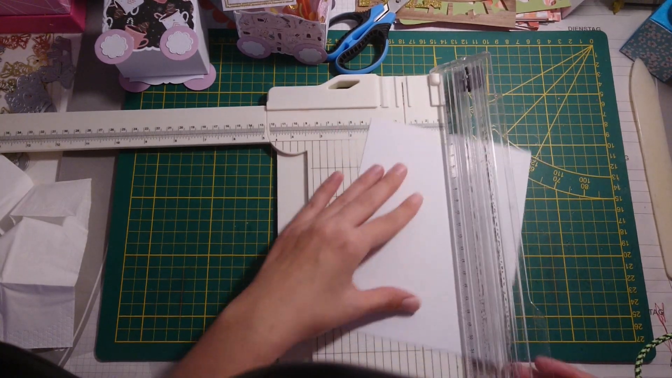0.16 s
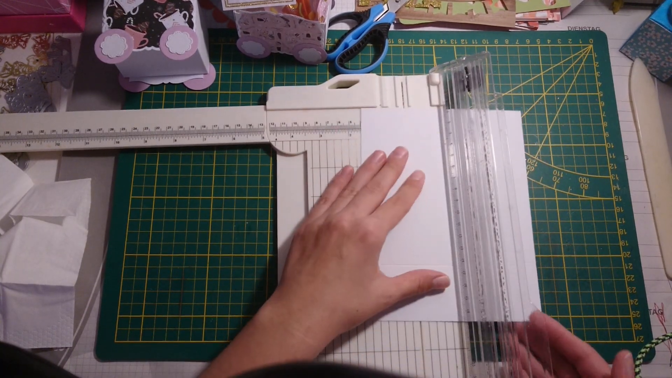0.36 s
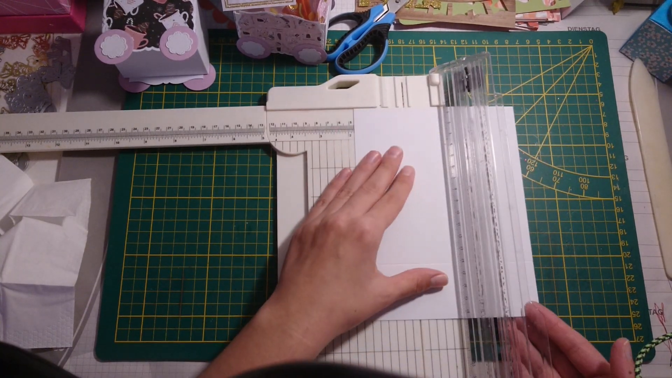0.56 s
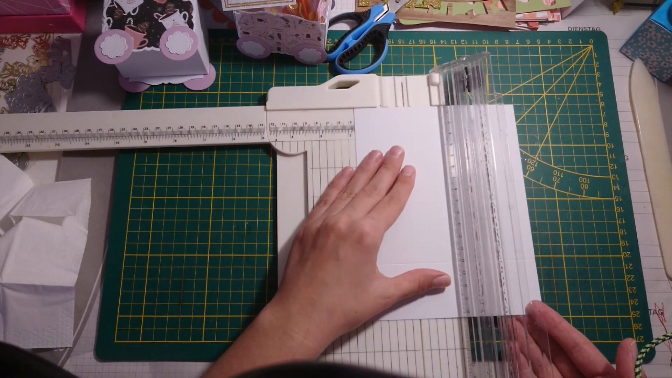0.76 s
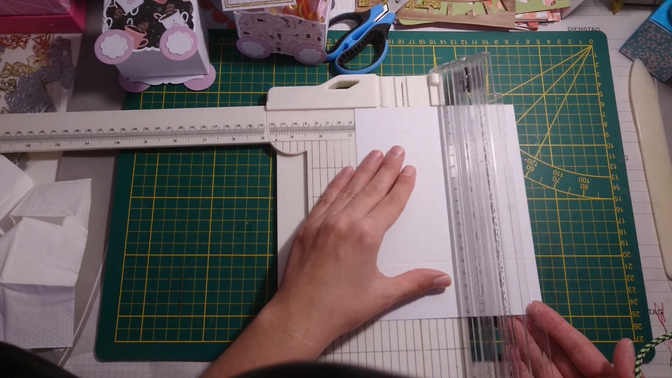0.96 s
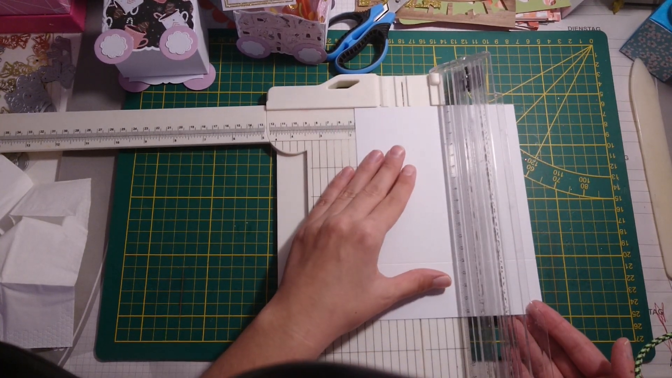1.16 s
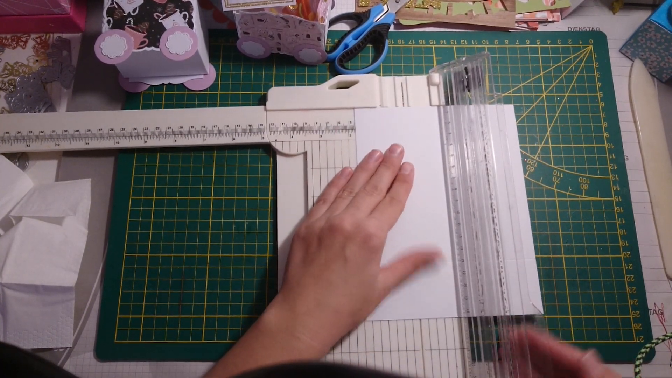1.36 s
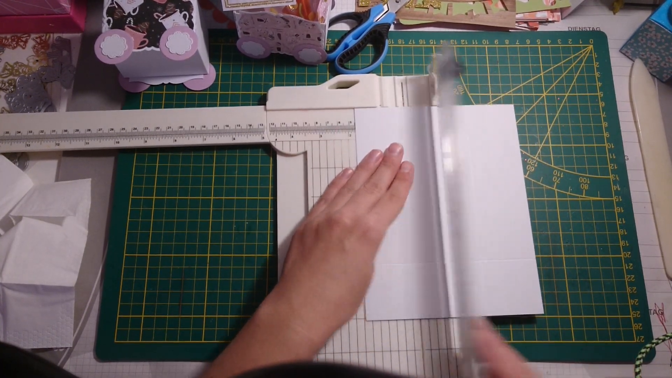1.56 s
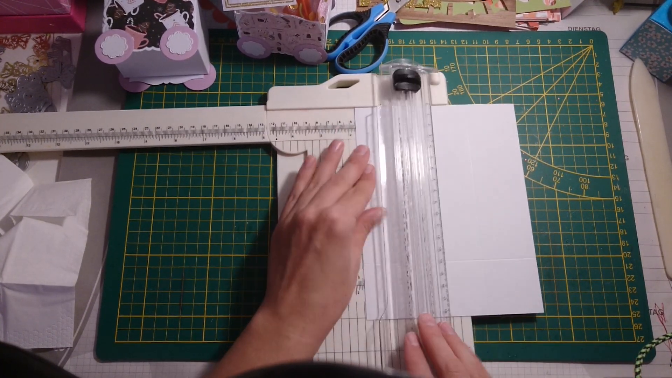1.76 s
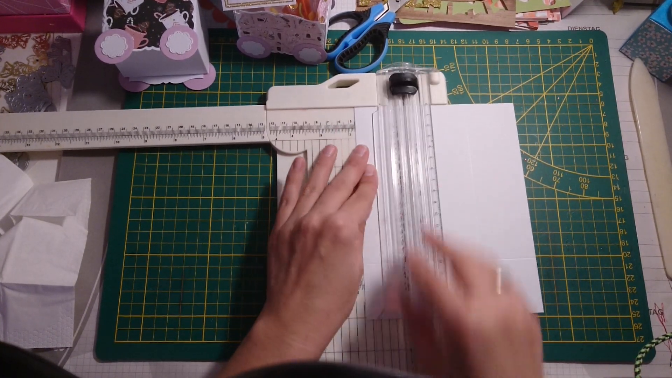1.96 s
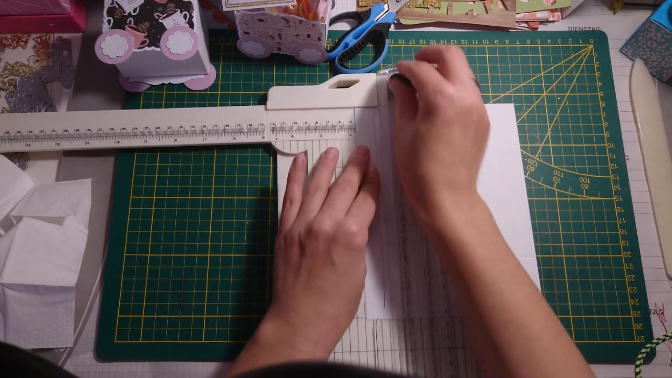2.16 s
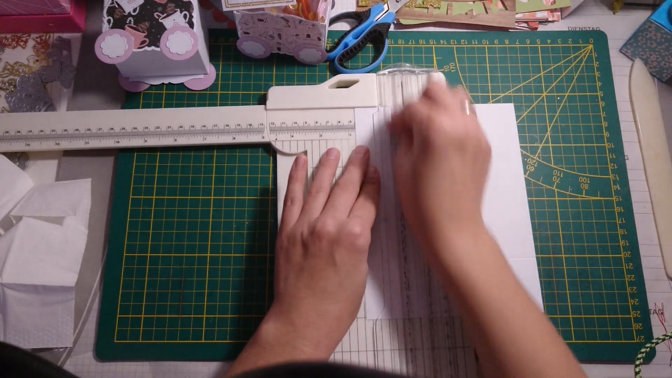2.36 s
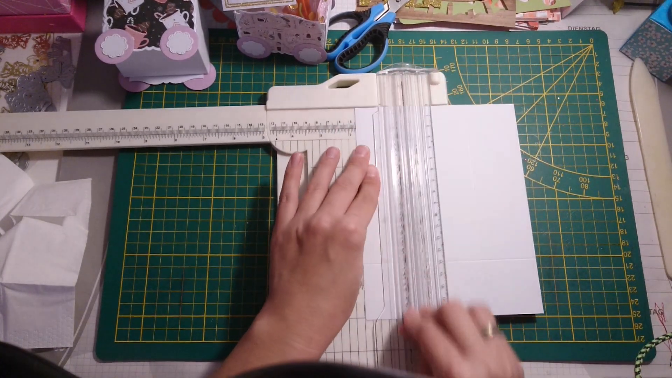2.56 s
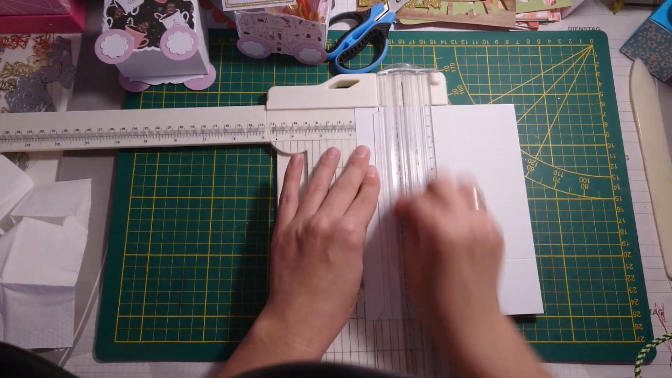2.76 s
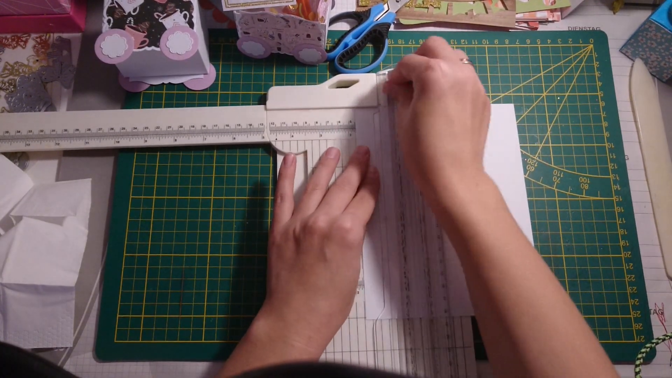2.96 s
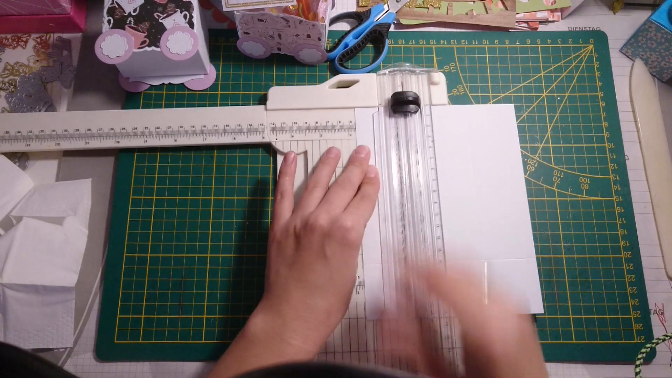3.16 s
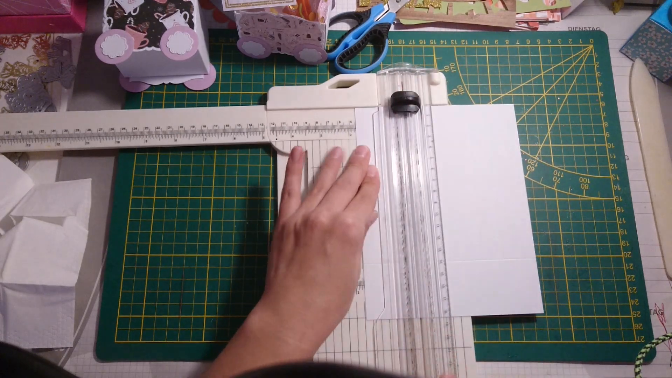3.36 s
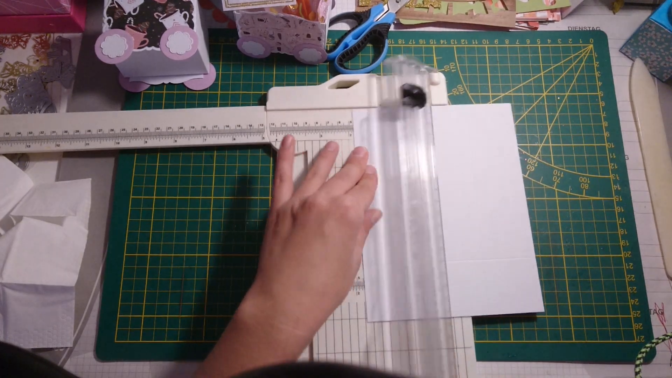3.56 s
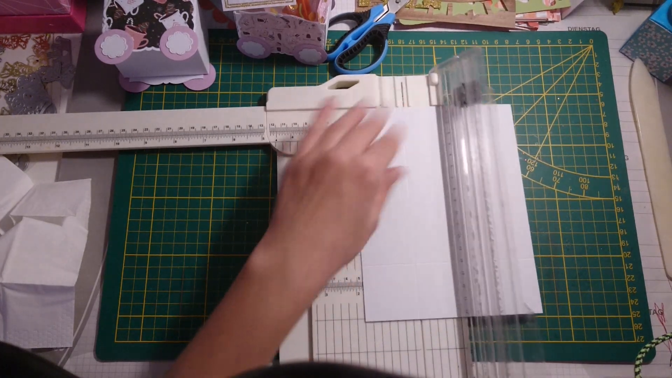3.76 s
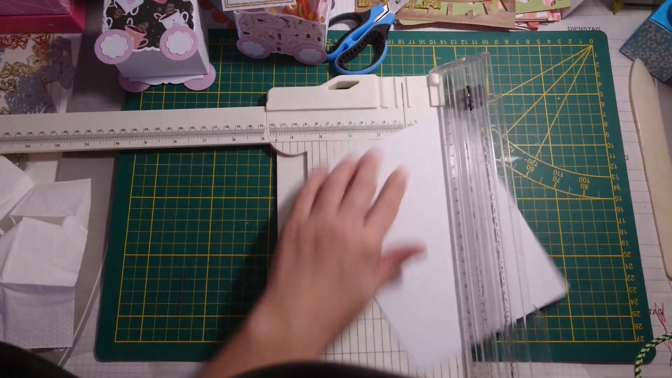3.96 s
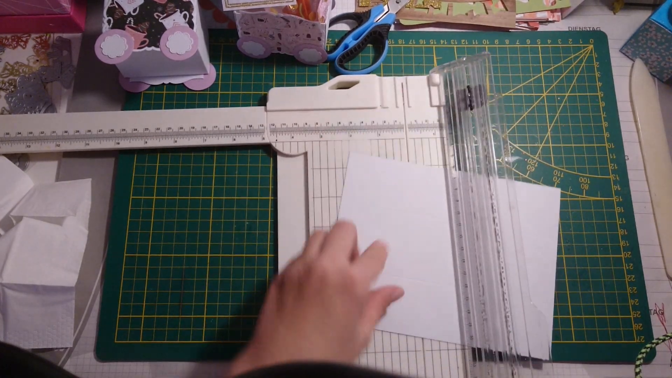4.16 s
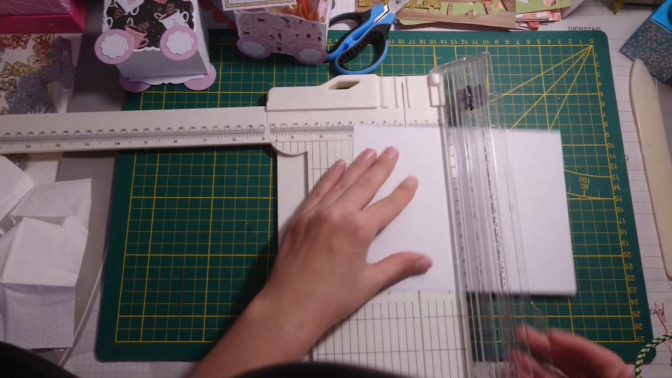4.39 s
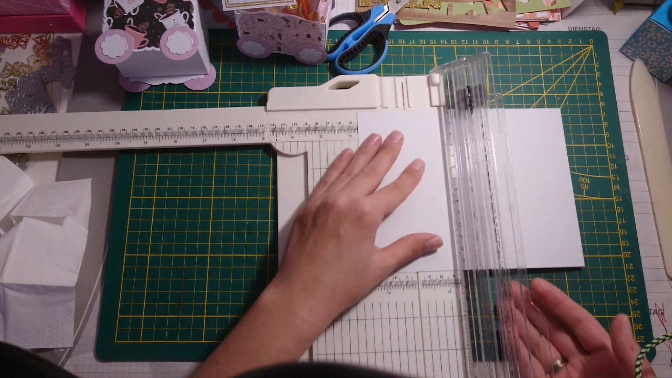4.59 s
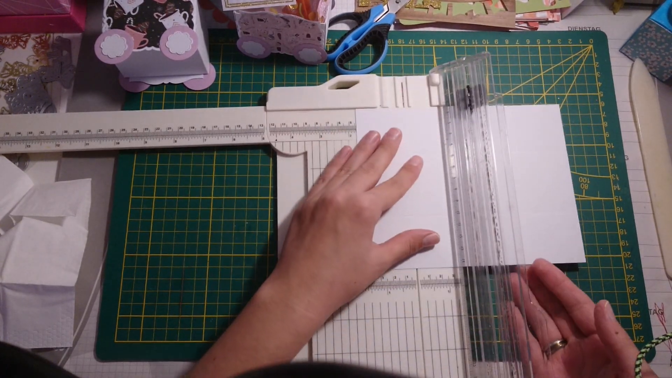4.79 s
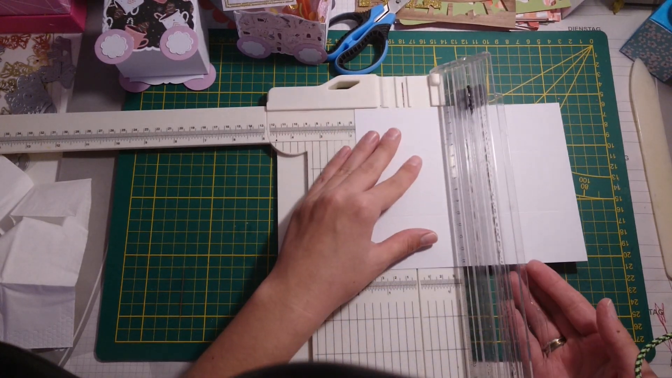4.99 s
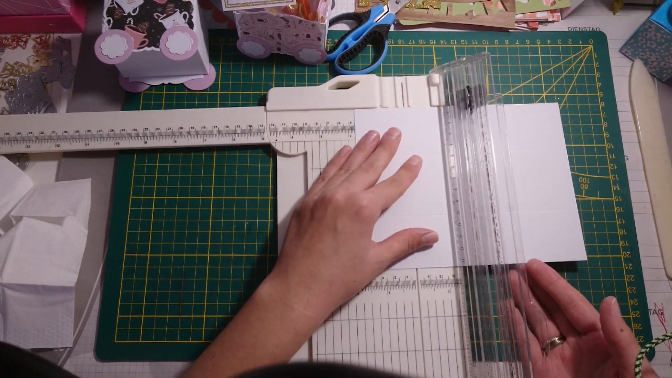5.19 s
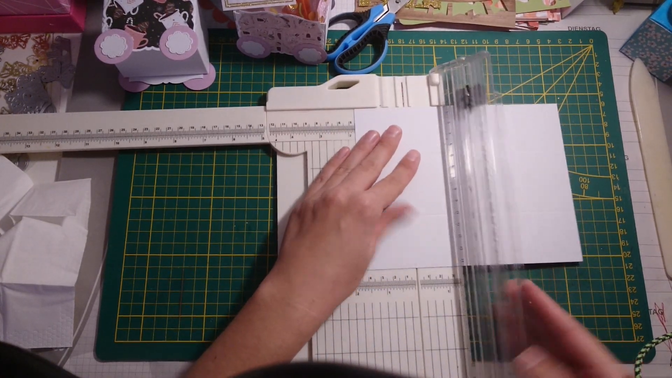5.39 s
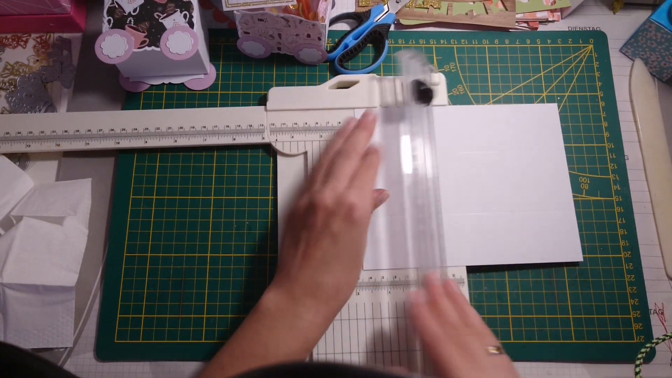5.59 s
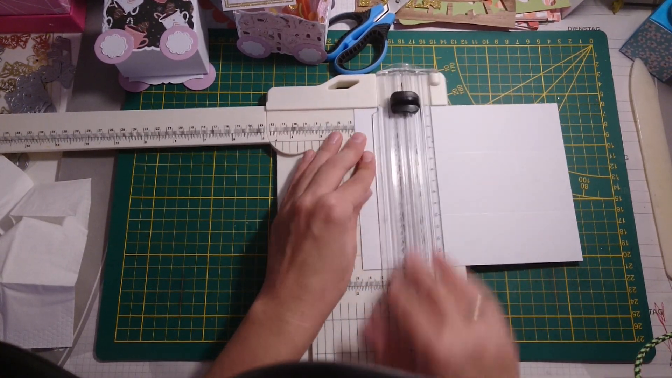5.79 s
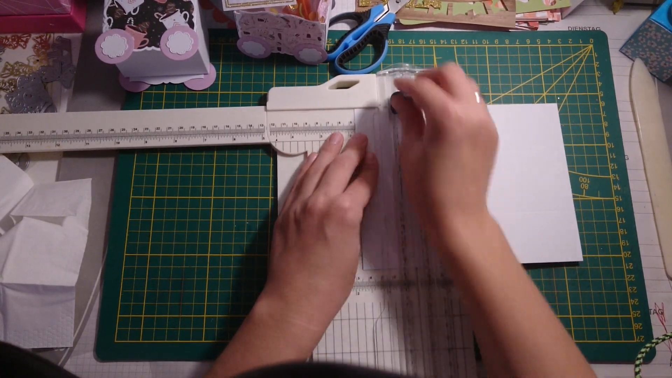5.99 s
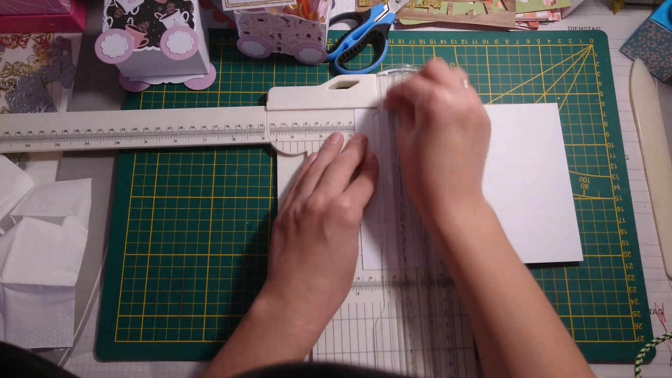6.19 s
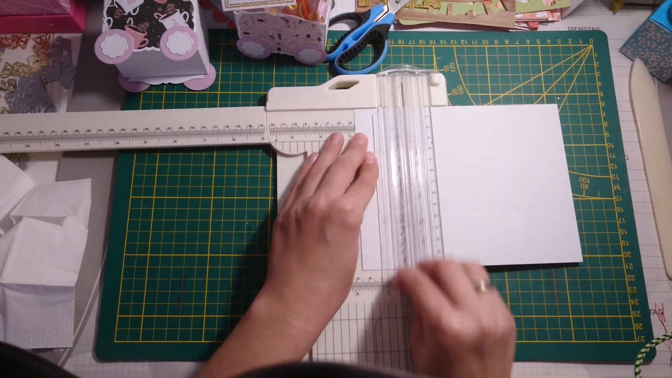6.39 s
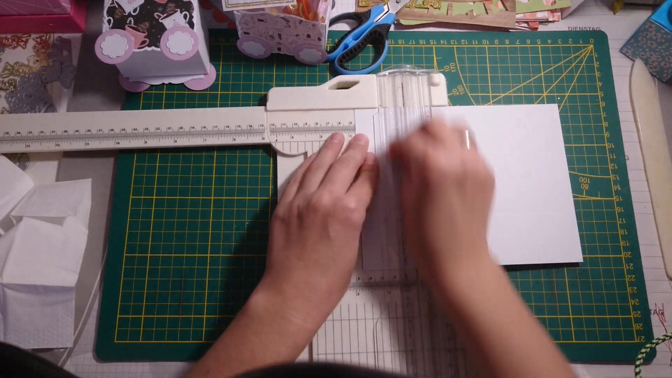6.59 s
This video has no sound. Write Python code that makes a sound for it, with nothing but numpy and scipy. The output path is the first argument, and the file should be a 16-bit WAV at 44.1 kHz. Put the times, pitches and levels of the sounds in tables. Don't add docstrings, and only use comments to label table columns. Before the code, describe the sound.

Close above a desk in a small room, card rustles onto a plastic paper trimmer and pauses. A brief hinge squeak leads into a rattling slam, then the slider rasps back and forth to a loud click. The guide clatters open, the sheet swishes round with a short whine, and after a quieter pause a harder slam and more scraping follow. A faint fan hums, stronger at the right.

```python
import sys
import numpy as np
from scipy import signal
from scipy.fft import rfft, irfft
from scipy.io import wavfile
from scipy.ndimage import uniform_filter1d

SR = 44100
rng = np.random.default_rng(int(sys.argv[2]) if len(sys.argv) > 2 else 0)


def decibels_to_gain(level_db):
    exponent = np.asarray(level_db, float) / 20
    return 10 ** exponent


def bounce(signal):
    frames = np.transpose(np.atleast_2d(signal))
    limited = np.clip(frames, -1, 1)
    pcm = np.round(limited * 32767).astype(np.int16)
    wavfile.write(sys.argv[1], SR, pcm)


N = 292824

# [f/Hz, density/dB per Hz]
FLOOR_LEFT = [(32, -112), (48, -95), (120, -107), (280, -119), (380, -115), (780, -125), (1300, -122),
              (1700, -112), (2300, -125), (3800, -122), (5000, -132), (7000, -123), (10500, -134),
              (11900, -146), (12500, -130), (13000, -146)]
FLOOR_RIGHT = [(32, -114), (48, -103), (120, -110), (280, -117), (540, -104), (680, -92.5), (780, -86),
               (900, -92), (1120, -101), (1950, -115), (2300, -110), (2950, -118), (3500, -110),
               (5000, -130), (9500, -128), (11900, -144), (12300, -123), (12650, -123), (13000, -146)]
# [f/Hz, level/dB]
PORT_LEFT = [(40, 0.5), (1000, -7), (2000, -4.5), (3000, 0.5), (3700, 3.5), (4600, 4), (5100, -2.5),
             (6000, 3.5), (6800, 3), (7900, -8.5), (8900, -4), (10000, -14), (10900, -44), (12500, -46),
             (13800, -56)]
PORT_RIGHT = [(40, 0), (1000, -14), (1700, -4.5), (2500, -9), (3100, -17), (3900, -2.5), (4600, -9.5),
              (5500, -5), (8000, -18.5), (11000, -27.5), (11700, -39), (12500, -22), (13200, -33),
              (13800, -51.5)]
# [delay/ms, left level/dB, right level/dB]
ECHOES = [(6.817, -18, -3.5), (11.7, -23, -20.5), (25.44, -17, -36), (.3, -16.5, -7), (0.751, -20, -12),
          (1.886, -20, -10)]
# [level/dB, low f/Hz, high f/Hz]
WASH_BANDS = [(13.4, 2890, 4900), (25.4, 950, 3150), (28.8, 260, 950), (26.1, 7000, 12600)]
# [f/Hz, level/dB, t60/s]
GUIDE = [(1004, 2, 0.014), (1380, -1, 0.015), (1692, 4, 0.016), (1950, 8.5, 0.0054), (2580, 3.5, 0.016)]
BASE = [(203, -16.5, 0.31), (346, -1.5, 0.067), (452, 5.5, 0.032), (567, 7.5, 0.03), (674, 9, 0.026),
        (787, 8.5, 0.026)]
RULER = [(3680, 0, .009), (3270, -12, .007), (4730, -4, .008)]
EDGE_RING = [(9300, -1.5, 0.0029), (7170, 0.5, 0.005)]
# [f/Hz, level/dB, t60/s]
DESK_LOW = [(51.7, -16.5, 0.33), (66.3, 1.5, 0.48)]
DESK_HIGH = [(129, 5, 0.14), (148, -6, 0.19)]
# [t/s, upper mode peak level/dB, lower mode re upper/dB]
THUDS = [(0.004, -61, -11.5), (0.191, -60, -14), (1.696, -68, -17), (1.816, -65.5, -1), (1.911, -54.5, -4),
         (2.301, -68, -23), (2.718, -45, -11), (2.86, -53, -9), (2.954, -43.5, -17.5), (3.357, -60.5, -8),
         (3.602, -93, -9), (3.93, -54.5, -23), (4.327, -64, -6), (5.449, -65.5, -7), (5.768, -61, 2.5),
         (6.099, -59.5, -10), (6.273, -65, -16), (6.441, -53.5, -6), (6.548, -46.5, -10)]
# [peak t/s, rise/s, fall/s, f/Hz, level/dB]
CREEPS = [
    (.55, 0.42, 0.45, 353, -91.5),
    (.65, 0.67, 0.28, 1640, -83.5),
    (2.199, 0.19, 0.52, 1588, -74.5),
    (6.271, 0.059, .06, 7000, -74.5),
]
# [t/s, f/Hz, level/dB]
SQUEAK_LOW = [(1.56, 1213, -73), (1.586, 1216, -49.5), (1.602, 1313, -59.5), (1.613, 1237, -51),
              (1.632, 1230, -56), (1.652, 1286, -66), (1.672, 1207, -75), (1.692, 1286, -69),
              (1.715, 1235, -69.5)]
SQUEAK_MID = [(1.578, 1500, -100), (1.588, 1570, -56.5), (1.598, 1700, -61.5), (1.61, 1540, -59),
              (1.622, 1560, -87)]
SQUEAK_HIGH = [(1.575, 2410, -83), (1.585, 2460, -69), (1.596, 2610, -57.5), (1.607, 2540, -74.5),
               (1.615, 2573, -66), (1.628, 2550, -77.5)]
# [t/s, f/Hz, level/dB]
WHINES = [
    [(3.94, 2775, -68), (3.958, 2730, -46), (3.984, 2570, -56), (3.992, 2555, -37.5), (4.03, 2580, -53)],
    [(5.46, 1700, -55.5), (5.585, 1887, -50), (5.63, 1910, -74)],
]
# [peak t/s, rise/s, fall/s, scrape level/dB, board drone level/dB]
CARD_SLIDES = [(0, 0.042, 0.1, -60.5, -60.5), (.2, 0.037, 0.25, -64.5, -73.5),
               (.33, 0.21, 0.075, -66.5, -76), (.48, 0.14, 0.13, -78, -81), (.62, 0.12, 0.24, -89, -85.5),
               (1.44, 0.19, 0.25, -74.5, -88), (1.57, 0.086, 0.29, -73.5, -70),
               (4.35, 0.089, 0.29, -63.5, -76), (4.62, 0.22, 0.1, -79, -85),
               (4.78, 0.029, 0.26, -82.5, -96), (5.41, 0.052, 0.24, -74, -79.5),
               (5.574, 0.18, 0.037, -66.5, -62), (5.65, 0.049, 0.11, -66.5, -65.5),
               (5.76, 0.044, 0.029, -66.5, -62)]
SLIDER_RUNS = [(2.4, 0.032, .35, -65, -57.5), (2.478, 0.085, 0.074, -61, -54.5),
               (2.56, 0.22, 0.15, -61, -52.5), (2.635, 0.16, 0.0079, -63.5, -54),
               (2.73, 0.041, 0.29, -61, -61), (2.8, 0.11, 0.11, -63, -54.5), (2.85, 0.1, 0.088, -63, -55),
               (2.91, 0.092, 0.064, -64, -58.5), (6.28, 0.044, 0.2994, -63.5, -62),
               (6.375, 0.11, .1, -60, -50.5), (6.43, 0.16, 0.11, -61.5, -50),
               (6.55, 0.074, 0.089, -62, -55), (6.64, 0.12, .1, -59.5, -49.5)]
HAND_SHIFTS = [(2.08, 0.088, 0.1213, -70.5, -77), (2.35, 0.12, 0.16, -74, -74.5),
               (3.04, 0.07, 0.19, -69, -62), (3.32, 0.17, 0.0482, -87.5, -74.5),
               (3.45, 0.059, 0.2375, -72.5, -69), (3.594, 0.083, 0.093, -66.5, -64.5),
               (3.76, 0.16, 0.14, -64.5, -63.5), (6.04, 0.048, 0.147, -69.5, -70.5),
               (6.11, 0.029, 0.0937, -74, -65)]
CARD_TURN = [(3.96, 0.0583, 0.18, -66, -67), (4.0, 0.082, 0.074, -65, -76.5), (4.07, 0.14, 0.11, -60, -74),
             (4.15, 0.097, 0.119, -66.5, -76), (4.205, 0.093, 0.018, -72, -79)]
# [t/s, crack peak level/dB, guide re crack/dB, base re crack/dB, edge re crack/dB]
CLICKS = [(0.179, -44, -10, -15, -12.5), (1.329, -69, -7, -19, -23), (1.8144, -37.5, -17, -10.5, -16),
          (1.8274, -29.5, -9, -11, -13), (1.846, -38, -7, -16, -30), (1.852, -48, -3, -31, -33),
          (1.87, -43.5, -9, -9, -26), (1.892, -39, -10, -8, -27), (2.8646, -23, -18.5, -21.5, -14),
          (3.3524, -26, -15.5, -15, -32), (3.358, -31, -13.5, -29.5, -11.5),
          (3.393, -34, -11.5, -21, -21.5), (3.4233, -37, -11.5, -20, -17), (3.5539, -37.5, -29, -12.5, -21),
          (3.7173, -42.5, -29, -20, -18), (3.9212, -55.5, 0.5, 3, -2), (5.6355, -41, -16, -35, -15.5),
          (5.6473, -36.5, -10.5, -30, -32), (6.4483, -28.5, -10.5, -7, -18.5),
          (6.4614, -36.5, -39, -7.5, -36)]
SCUFFS = [(.16, -55.5, -8, -4, -13), (1.488, -52, -10, -21.5, -7), (1.7494, -43.5, -3, -8.5, -17.5),
          (2.3825, -50.5, -16, 3.5, -23.5), (2.418, -53.5, -9, -18, -4), (2.6344, -46, -5, -5.5, -9.5),
          (2.7207, -52.5, 0, 0, -27.5), (2.8114, -46, -10, -10, -17.5), (3.5972, -43, -18, -9, -18),
          (3.681, -41, -25, -25, -26), (3.9921, -56, -25.5, -28, 1), (4.3301, -52, -9.5, -14, -8),
          (4.4451, -48, -11, -32, -10), (4.51, -57, -4.5, -30, -16.5), (5.4445, -55.5, -2.5, -5, -8.5),
          (6.097, -49.5, -12, -8, -14), (6.5385, -39.5, -11.5, -13.5, -26)]
BRUSHES = [(1.58, -56.5, 0, -16, -4.5), (1.727, -48.5, -4.5, -14, -20), (3.1, -58.5, -10, -12, -23),
           (3.584, -43.5, -17.5, -13.5, -12.5), (3.594, -41, -11, -13, -19), (3.676, -44, -11, -21, -16.5),
           (3.716, -39.5, -11, -24, -15.5), (3.744, -45.5, -3.5, -10, -17), (3.756, -49, -3, -9, -20),
           (4.26, -43, -21, -13, -10.5), (4.266, -45.5, -11.5, -13.5, -8)]
SNAGS = [(2.4098, -46, -10.5, -23, -22), (2.455, -50, -8.5, 0, -8), (2.5115, -44, -20, -9, -9),
         (2.5494, -50, -4, -15, -24), (2.77, -44.5, -10, -9, -9.5), (3.912, -53, -11.5, -4.5, -10),
         (3.9527, -48, -19, -22, -23), (4.009, -42, -29, -28, -10), (4.024, -52.5, -26, -25, 3),
         (4.138, -49, -3, -22, -18), (4.158, -45.5, -5, -15, -18), (4.173, -48.5, -4, -18, -22),
         (6.2613, -52, -9.5, -12, -24), (6.2952, -53.5, -16, -5.5, -0.5), (6.336, -50, -7.5, 5.5, -6.5),
         (6.371, -50.5, -24.5, 10.5, -12), (6.396, -48, -17, 7, -16), (6.426, -51, -3.5, 10.5, -19)]
SLAMS = [(1.9065, -40, -13, -18, -26.5), (1.9112, -19.5, -17, -9, -23), (1.9143, -12, -20, -13.5, -7.5),
         (1.9162, -18, -10, -14.5, -18), (1.919, -23.5, -8.5, -16, -9.5), (1.9225, -14, -30, -27, -17.5),
         (1.9258, -14, -29, -30, -19), (1.9295, -26, -10, -29, -24), (1.9348, -27.5, -12, -13, -22),
         (1.9443, -32.5, -20.5, -26, -22), (1.956, -26, -18, -20.5, -23),
         (1.9613, -26.5, -13.5, -12, -19.5), (5.7662, -26.5, -13, -6, -20.5), (5.768, -23, -17.5, -23, -21),
         (5.7782, -21, -19, -20.5, -15), (5.7806, -6, -8, -22.5, -14.5), (5.7822, -7.5, -17, -37.5, -10),
         (5.7847, -8.5, -22, -25, -10.5), (5.787, -10.5, -21, -19, -16), (5.7905, -16, -19.5, -16, -16.5),
         (5.8055, -12, -17.5, -33, -9), (5.8078, -12, -22, -34.5, -16), (5.8152, -17, -20, -27, -21.5),
         (5.8225, -30, -23, -32.5, -12.5)]
END_STOP = [
    (2.954, -10, -25, -21, -16),
]

ROOM_T60_S, ROOM_DB = 0.42, [-7.5, 0.5]
WASH_T60_S, WASH_DB = 0.39, -3
# (edge re scrape/dB, sheet re scrape/dB)
CARD_TONE, SLIDER_TONE = (2.8, 1.8), (2.1, -0.96)
HAND_TONE, TURN_TONE = (-6, 2), (6.5, 0.42)
STROKE_DB, STROKE_ROUND = 20.5, 1.2
DRONE_REST_HZ, DRONE_REST_DB, DRONE_SAG_HZ_PER_DB = 696, -86.5, 7
CLICK_MS, SCUFF_MS, SLAM_MS, STOP_MS, BRUSH_MS = 3.0, 4.8, 1.2, 1.3, 5.8
CREEP_WIDTH = 0.26
WAVER_DB = 1.1
PEAK_TOP = 0.95
WHISTLE_HZ, WHISTLE_DB = (14750, 15000), -93


def unit(x):
    return x / np.sqrt(np.mean(x ** 2))


def band(x, lo_hz, hi_hz):
    return signal.sosfilt(signal.butter(2, [lo_hz, hi_hz], "bandpass", fs=SR, output="sos"), x)


def colour(x, points):
    hz, db = np.transpose(points)
    grid = np.maximum(np.fft.rfftfreq(4096, 1 / SR), 1)
    log_gain = np.interp(np.log(grid), np.log(hz), db) * np.log(10) / 20
    cepstrum = irfft(log_gain)
    cepstrum[1:2048] *= 2
    cepstrum[2049:] = 0
    impulse = irfft(np.exp(rfft(cepstrum)))
    return signal.fftconvolve(x, impulse)[:N]


def ring(x, modes):
    out = 0
    for k, (hz, db, t60) in enumerate(modes):
        pole = np.exp((2j * np.pi * hz - np.log(1000) / t60) / SR)
        out = out + (-1) ** k * decibels_to_gain(db) * signal.lfilter([1], [1, -pole], x).imag
    return out


def walk(rate):
    hold = int(SR / rate)
    steps = np.repeat(rng.standard_normal(N // hold + 1), hold)
    return 1.6 * uniform_filter1d(steps, hold)[:N]


def tone(hz):
    return np.sin(2 * np.pi * np.cumsum(hz) / SR)


def play(rows, rest):
    end = (rows[-1][0] + 1 / SR, *rows[-1][1:])
    s, *columns = np.transpose(list(rows) + [end])
    t = np.arange(N) / SR
    return np.array([np.interp(t, s, c, left=r, right=r) for c, r in zip(columns, rest)])


def grain(rough_db):
    return unit(rng.standard_normal(N) * decibels_to_gain(rough_db * rng.exponential(size=N)))


def background():
    left, right = rng.standard_normal((2, N)) * np.sqrt(SR / 2)
    right = right + signal.lfilter(*signal.butter(1, 200, fs=SR), left - right)
    flicker = decibels_to_gain(0.6 * walk(30))
    return np.array([colour(left, FLOOR_LEFT), colour(right * flicker, FLOOR_RIGHT)])


def room(near, far, wash):
    t = np.arange(SR // 2) / SR
    mid, side = rng.standard_normal((2, len(t)))
    side = band(side, 700, 20000)
    fade = decibels_to_gain(-60 * t / ROOM_T60_S) * np.clip(t / 0.00097, 0, 1)
    out = []
    for c, sign in enumerate((1, -1)):
        tail = fade * (mid + sign * side)
        early = np.zeros(SR // 20)
        early[0] = 1
        for ms, *echo_db in ECHOES:
            early[int(ms * SR / 1000)] = decibels_to_gain(echo_db[c])
        wet = signal.fftconvolve(far[c], tail / np.sqrt(np.sum(tail ** 2)))[:N]
        wet = wet + wash[0] + sign * band(wash[1], 650, 20000)
        out.append(signal.fftconvolve(near[c], early)[:N] + decibels_to_gain(ROOM_DB[c]) * wet)
    return out


def thuds():
    low, high = np.zeros((2, N))
    for s, db, low_db in THUDS:
        high[int(s * SR)] = decibels_to_gain(db)
        low[int(s * SR)] = decibels_to_gain(db + low_db)
    push = np.hanning(int(0.0085 * SR))
    desk = ring(low, DESK_LOW) + ring(high, DESK_HIGH)
    return decibels_to_gain(4.5) * signal.fftconvolve(desk, push / push.sum())[:N]


def creep():
    t, out = np.arange(N) / SR, 0
    for s, rise, fall, hz, db in CREEPS:
        away = np.abs(t - s) / np.where(t < s, rise, fall)
        whistle = unit(band(grain(1.2), hz * (1 - CREEP_WIDTH), hz * (1 + CREEP_WIDTH)))
        out = out + decibels_to_gain(db + 14.0 - STROKE_DB * away ** 2) * whistle
    return out


def squeak():
    # (curve, pitch waver as a fraction, waver rate/Hz, lift/dB)
    voices = [(SQUEAK_LOW, 0.013, 120, 14), (SQUEAK_MID, 0.07, 300, 9), (SQUEAK_HIGH, 0.01, 120, 16),
              (WHINES[0], 0.07, 500, -2.5), (WHINES[1], 0.06, 400, 2.5)]
    out = 0
    for rows, waver, rate, lift_db in voices:
        hz, db = play(rows, [0, -200])
        strength = decibels_to_gain(db + lift_db + WAVER_DB * walk(70))
        out = out + strength * tone(hz * (1 + waver * walk(rate)))
    return out


def strokes():
    t = np.arange(0, N / SR + 0.002, 0.001)
    power = 1e-20
    kinds = [(CARD_SLIDES, CARD_TONE), (SLIDER_RUNS, SLIDER_TONE),
             (HAND_SHIFTS, HAND_TONE), (CARD_TURN, TURN_TONE)]
    for rows, (edge_db, sheet_db) in kinds:
        for s, rise, fall, db, drone_db in rows:
            away = np.abs(t - s) / np.maximum(np.where(t < s, rise, fall), 0.01)
            peak_db = np.array([[db], [db + edge_db], [db + sheet_db], [drone_db]])
            power = power + decibels_to_gain(peak_db - STROKE_DB * away ** STROKE_ROUND) ** 2
    pressure_db = np.maximum(10 * np.log10(power[3]) - DRONE_REST_DB, 0)
    hz = DRONE_REST_HZ - DRONE_SAG_HZ_PER_DB * pressure_db
    *gains, hz = (np.interp(np.arange(N) / SR, t, v) for v in (*np.sqrt(power), hz))
    return np.array(gains), hz


def rubbing():
    gains, centre_hz = strokes()
    catch = 1.2 * walk(53)
    glide = unit(band(grain(1.5), 7.6, 32)) * tone(centre_hz * (1 + 0.091 * walk(11)))
    board = BASE + [(123, -12, 0.08), (197, -7.5, 0.022), (285, -15.0, 0.007), (338, -3.5, 0.015)]
    fixed = unit(ring(grain(2.7), board))
    drone = (fixed + 0.95 * glide) * decibels_to_gain(6.5 + 0.4 * walk(45) + 2.0 * walk(13))
    shared = grain(2.0)
    out = []
    for _ in range(2):
        own = grain(2.3)
        fibres = (0.1 * shared + 1.1 * own) * decibels_to_gain(catch)
        scrape = unit(band(fibres, 2700, 6240)) * decibels_to_gain(9.5 + 2.4 * walk(25))
        edge = unit(band(fibres, 6050, 21000)) * decibels_to_gain(16.5 + 1.7 * walk(21))
        sheet = unit(band(shared + 0.083 * fibres, 1100, 2700)) * decibels_to_gain(8.0 + 0.5 * walk(29))
        out.append(np.sum(gains * [scrape, edge, sheet, drone], axis=0))
    return np.array(out)


def plastic(drive, ruler_db):
    crack, guide, base, edge = drive[:, :N]
    crack_sound = band(crack + decibels_to_gain(ruler_db) * ring(crack, RULER), 3050, 5200)
    edge_sound = band(edge + decibels_to_gain(-26.0) * ring(edge, EDGE_RING), 6600, 16000)
    guide_sound = ring(guide, GUIDE)
    base_sound = band(ring(base, BASE), 140, 2700)
    return decibels_to_gain(13.0) * crack_sound + decibels_to_gain(25.5) * edge_sound + decibels_to_gain(-6.0) * guide_sound + decibels_to_gain(-14.5) * base_sound


def clicks():
    near, far = np.zeros((2, 4, N + 2048))
    t = np.arange(2048) / SR
    # (contacts, length/ms, softness of the swell)
    kinds = [(CLICKS, CLICK_MS, 1), (SCUFFS, SCUFF_MS, 2), (SLAMS, SLAM_MS, 1),
             (END_STOP, STOP_MS, 1), (BRUSHES, BRUSH_MS, 4), (SNAGS, CLICK_MS, 2)]
    events = [(ms, soft, *row) for rows, ms, soft in kinds for row in rows]
    chance = rng.standard_normal((len(events), 2, 2048))
    for (ms, soft, s, db, guide_db, base_db, edge_db), (sign, size) in zip(events, chance):
        span = max(ms, 0.3) / 1000
        shape = np.exp(-t / span) * (1 - np.exp(-t / (0.5 * span))) ** soft
        shape = 0.385 * shape / shape.max()
        rattle = shape * sign * decibels_to_gain(2.0 * size)
        rattle = rattle * np.sqrt(np.sum(shape ** 2) / np.sum(rattle ** 2))
        push = decibels_to_gain(db + np.array([0, guide_db, base_db, edge_db]))
        i = int((s - 0.25 * span) * SR)
        near[:, i:i + len(t)] += np.outer(push, rattle)
        far[:, i + int(span * SR)] += push ** 2 * np.sum(rattle ** 2)
    keep = decibels_to_gain(-120 / WASH_T60_S / SR)
    spread = decibels_to_gain(WASH_DB) * np.sqrt(signal.lfilter([1 - keep], [1, -keep], far + 1e-18))
    noises = spread[:, :N] * rng.standard_normal((2, 4, N))
    wash = []
    for parts in noises:
        bands = zip(parts, WASH_BANDS)
        wash.append(sum(decibels_to_gain(db) * band(part, lo_hz, hi_hz) for part, (db, lo_hz, hi_hz) in bands))
    return plastic(near, -31), wash


def scene():
    rub, tones = rubbing(), squeak() + creep()
    near, wash = clicks()
    left, right = room(rub + tones + near + thuds(), rub + 0.4 * tones, wash)
    right = np.roll(right, 2)
    return np.array([colour(left, PORT_LEFT), colour(right, PORT_RIGHT)]) + background()


def low_pass(x):
    return signal.sosfilt(signal.butter(12, 15650, fs=SR, output="sos"), x)


def record(dry):
    cut = signal.butter(6, 42, "highpass", fs=SR, output="sos")
    dull = signal.butter(10, 13900, fs=SR, output="sos")
    rounded = PEAK_TOP * np.tanh(dry / PEAK_TOP)
    whistle = decibels_to_gain(WHISTLE_DB + 2.0 * walk(25)) * unit(band(grain(0), *WHISTLE_HZ))
    mix = signal.sosfilt(np.vstack([cut, dull]), rounded) + whistle
    return low_pass(mix)


dry = scene()
out = record(dry)
bounce(out)
```